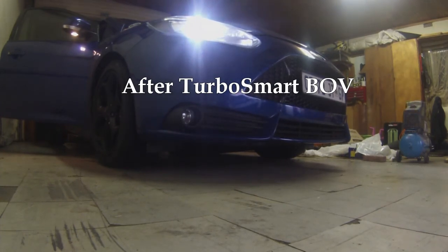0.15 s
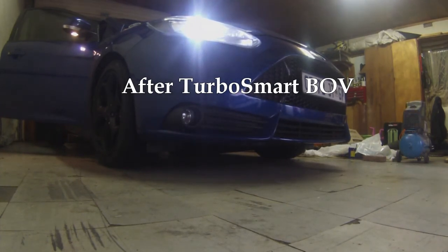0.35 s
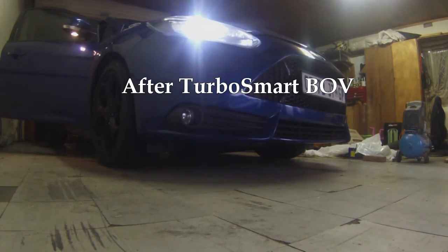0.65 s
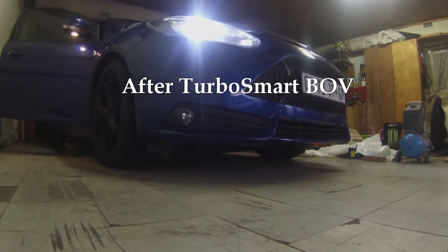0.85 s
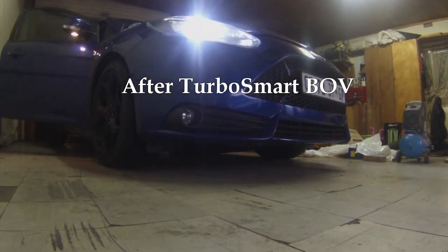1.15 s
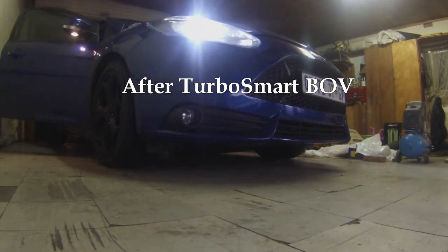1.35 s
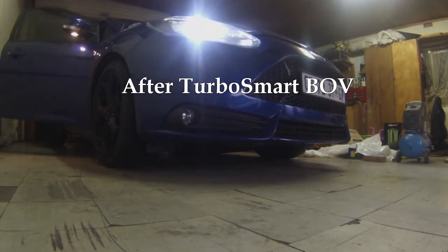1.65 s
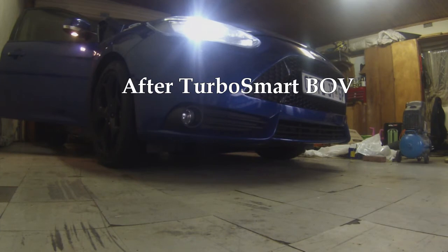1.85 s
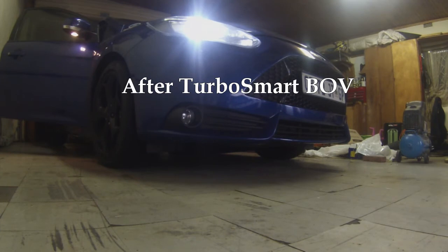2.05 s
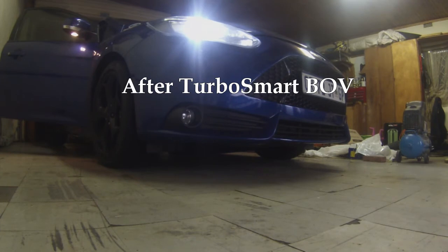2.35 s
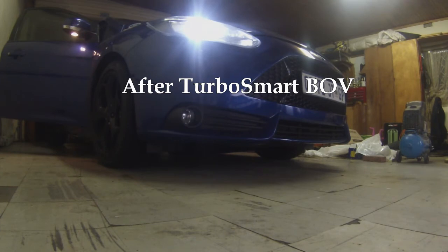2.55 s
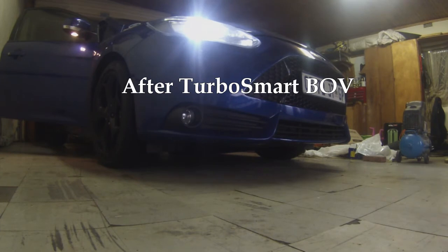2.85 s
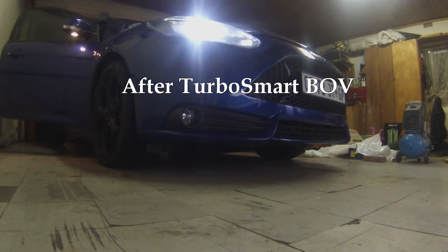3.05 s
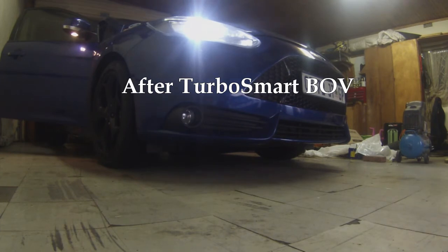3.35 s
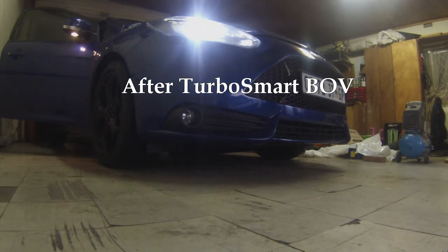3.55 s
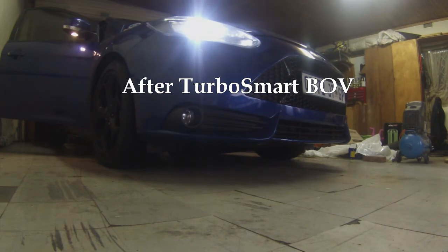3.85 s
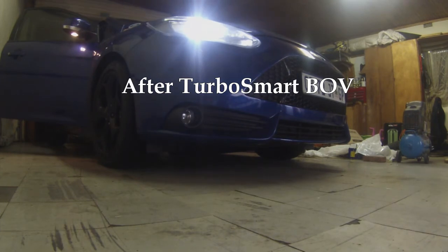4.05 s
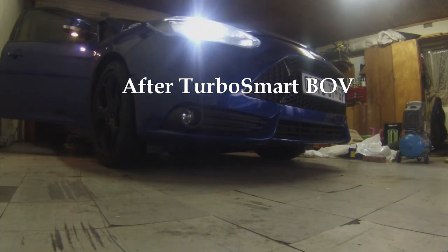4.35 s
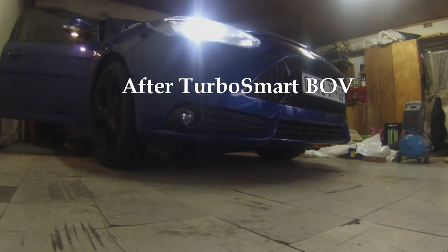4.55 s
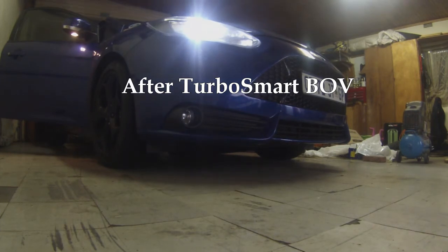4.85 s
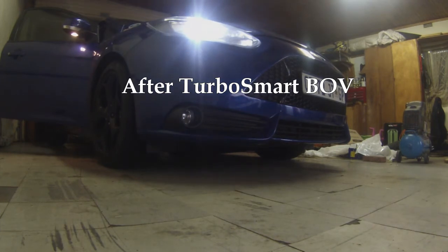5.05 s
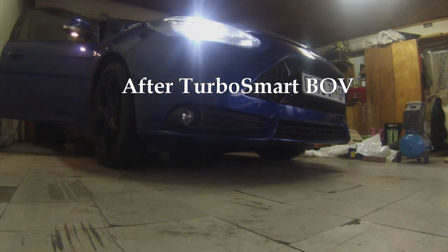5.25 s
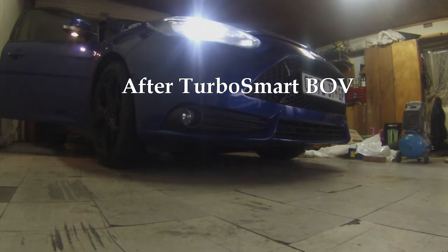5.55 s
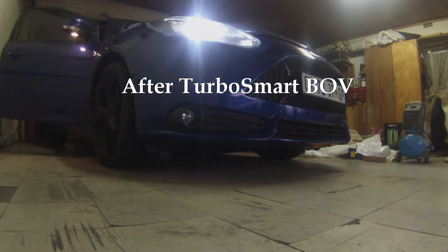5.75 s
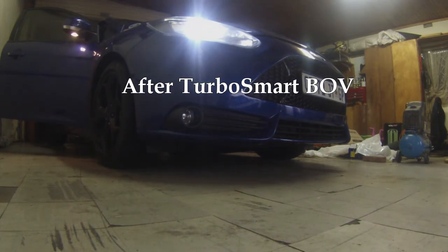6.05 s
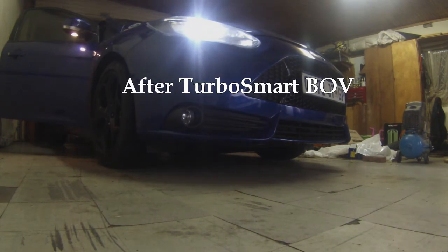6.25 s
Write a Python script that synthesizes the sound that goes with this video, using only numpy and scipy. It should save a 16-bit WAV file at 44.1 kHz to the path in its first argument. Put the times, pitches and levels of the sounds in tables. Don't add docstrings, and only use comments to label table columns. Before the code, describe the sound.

A turbo four-cylinder car engine idles in a closed garage, revs up twice, and each time a valve vents with a bright hissing whoosh.

```python
import sys
import numpy as np
from scipy import signal
from scipy.fft import rfft, irfft, next_fast_len
from scipy.io import wavfile
from scipy.ndimage import uniform_filter1d

SR = 44100
rng = np.random.default_rng(int(sys.argv[2]) if len(sys.argv) > 2 else 0)


def master(y):
    cut = np.clip(np.atleast_2d(y).T, -1, 1)
    pcm = np.round(cut * 32767)
    wavfile.write(sys.argv[1], SR, pcm.astype(np.int16))


def gain_from_db(level_db):
    decades = np.asarray(level_db, float) / 20
    return 10 ** decades


N = 282169
IDLE_PER_S = 30

# f/Hz, level/dB
LOADED = [(30, -72), (38, -55), (49, -41), (64, -47), (78, -33.5), (87.5, -47.5), (92.5, -41), (101, -75)]


def band(x, low_hz, high_hz):
    return signal.sosfilt(signal.butter(2, [low_hz, high_hz], "band", fs=SR, output="sos"), x)


def rms_one(x):
    return x / np.sqrt(np.mean(x ** 2) + 1e-20)


def at_hz(points, hz):
    table_hz, level_db = np.transpose(points)
    return np.interp(np.log(hz), np.log(table_hz), level_db)


def drift(rate_hz):
    r = np.exp(-2 * np.pi * rate_hz * 40 / SR)
    white = rng.standard_normal(N // 40 + 2002)
    slow = signal.lfilter([1], [1, -2 * r, r * r], white)[2000:]
    return np.interp(np.arange(N) / 40, np.arange(len(slow)), rms_one(slow))


def resonate(x, hz, width_hz):
    r = np.exp(-np.pi * width_hz / SR)
    poles = [1, -2 * r * np.cos(2 * np.pi * hz / SR), r * r]
    return signal.lfilter(np.array([1, 0, -1]) * (1 - r * r) / 2, poles, x)


def through(x, modes):
    return sum((-1) ** k * gain_from_db(db) * resonate(x, hz, width) for k, (hz, width, db) in enumerate(modes))


def lifted(x, peaks):
    for hz, width, db in peaks:
        x = x + (gain_from_db(db) - 1) * resonate(x, hz, width)
    return x


def air(spectrum, patchy_db, tilt_db=0):
    hz, level_db = np.transpose(spectrum)
    white, together, out = rng.standard_normal((2, N)), drift(19), 0
    edges = np.geomspace(hz[0], hz[-1] * 1.1, int(3 * np.log2(hz[-1] / hz[0])) + 2)
    for k, (low, high) in enumerate(zip(edges, edges[1:])):
        mid = np.sqrt(low * high)
        own_db = at_hz(spectrum, mid) + tilt_db * np.log2(mid / 9000)
        flutter_db = patchy_db * (together + 1.17 * drift(9))
        out = out + gain_from_db(own_db + flutter_db) * band(white[k % 2], low, high)
    return out


def tones(turns, orders):
    start = rng.random(len(orders))
    return sum(np.sqrt(2) * gain_from_db(db) * np.sin(2 * np.pi * (k * turns + p)) for (k, db), p in zip(orders, start))


def throttle():
    # pedal down t/s, pedal up t/s
    blips = [
        (1.1, 1.778),
        (4.32, 5.05),
    ]
    down_s, up_s = 0.24, 0.14
    now = np.arange(N) / SR
    return sum(np.interp(now, [down, down + down_s, up, up + up_s], [0, 1, 1, 0]) for down, up in blips)


def exhaust(turns, late_turns, firing, late_firing, opening):
    # f/Hz, level/dB
    coasting = [(32, -72), (41, -58.5), (51.5, -60), (54.5, -52), (61, -53.5), (66, -47), (74, -53),
                (92, -48.5)]
    # multiple of firing rate, level/dB
    overtones = [(2.75, -5), (3.25, -6), (4.2, 0), (5, 0), (5.8, 0), (6.25, -1), (7, 1), (7.25, 1), (8, 0),
                 (9, -4)]
    # f/Hz, width/Hz, level/dB
    pipe = [(183, 47, 3), (247, 63, 0.5), (292.4, 32, 5.5), (327, 56, -4), (463.4, 26, 1), (531, 22, -0.5),
            (613, 46, -0.5), (759, 40, -3.5), (833, 23, 1), (940, 19, 1)]
    fall_db_per_hz, fall_span_hz = 1.5, 12.6
    load_db, closed_db = -61, -22

    above_hz = np.clip(late_firing - coasting[-1][0], 0, fall_span_hz)
    coast_db = at_hz(coasting, late_firing) - fall_db_per_hz * above_hz
    note_db = opening * at_hz(LOADED, late_firing) + (1 - opening) * coast_db
    note = gain_from_db(note_db + 0.5 * drift(12)) * tones(late_turns, [(1, 0)])
    second = multiple_gain(2, firing, opening) * gain_from_db(0.5 * drift(10)) * np.sqrt(2) * np.cos(4 * np.pi * turns)
    third = multiple_gain(3, firing, opening) * gain_from_db(0.5 * drift(10)) * np.sqrt(2) * np.cos(6 * np.pi * turns)

    uneven = turns + 0.015 * drift(25)
    pulse_db = load_db + closed_db * (1 - opening) + 4.9 * np.log2(firing / 90) + 3.7 * drift(46)
    pulses = gain_from_db(pulse_db) * tones(uneven, overtones)
    return note + second + third + through(through(pulses, pipe), pipe)


def multiple_gain(k, firing, opening):
    # f/Hz, level/dB
    loaded_high = [(115, -84), (155, -66), (188, -56), (220, -69), (250, -58.5), (280, -52), (295, -71),
                   (320, -63)]
    coast_multiples = (-72.5, -82)
    idle_multiples = (-67, -69.5)
    below_first_db, idle_fade_per_s = -12, 4
    bite = 0.4

    idling = np.clip(1 - (firing - IDLE_PER_S) / idle_fade_per_s, 0, 1)
    bass = [(hz, db + below_first_db) for hz, db in LOADED]
    loaded_db = at_hz([*bass, *loaded_high], k * firing)
    rest = gain_from_db(coast_multiples[k - 2]) + idling * gain_from_db(idle_multiples[k - 2])
    return opening ** bite * gain_from_db(loaded_db) + (1 - opening) * rest


def valve():
    # f/Hz, density/dB per Hz
    jet_spectrum = [(420, -47), (650, -16), (920, -7), (1250, -6.5), (1500, -2.5), (1850, -3.5), (2400, -1),
                    (3040, 2.5), (3400, 1), (5200, -1.5), (5800, -5.5), (6520, -5), (11800, -14),
                    (15200, -19)]
    # f/Hz, width/Hz, lift/dB
    jet_peaks = [(1320, 100, -2.5), (1497, 18, 10.5), (1490, 50, -1), (1960, 31, 12), (2330, 44, 6.5),
                 (2480, 100, 8.5), (2705, 15, 10.5), (3010, 71, 7), (3166, 4.8, 14), (3430, 21, -12),
                 (3755, 120, 5.5), (4177, 81, 10.5), (4530, 29, 11), (4830, 80, 2), (5800, 420, 8),
                 (7330, 130, 5.5), (8680, 300, 6), (11660, 270, 5)]
    # f/Hz, width/Hz
    duct = (2815, 690)
    flow_db, tilt_db, duct_db = vent_flow()
    jet = air(jet_spectrum, patchy_db=0.6, tilt_db=tilt_db)
    singing = gain_from_db(duct_db) * resonate(resonate(jet, *duct), *duct)
    jet = lifted(jet + singing, jet_peaks)
    return gain_from_db(flow_db) * jet / np.std(band(jet, 6500, 12000))


def vent_flow():
    # crack t/s, swell/s, hold/s, peak level/dB, first rush re peak/dB
    vents = [
        (1.766, 0.11, 0.11, -45, -7),
        (4.974, 0.059, 0.028, -35.5, -2.5),
    ]
    shut_db, leak_s, leak_db, open_s = -95, 0.04, -20, 0.04
    fast_s, fast_db_per_s, slow_db_per_s = 0.52, 27, 20
    thin_db, thin_s, settled_db = 2.5, 0.083, -0.5
    sings_at_db, sing_db, sing_slope, sing_rest_db = -51, 2, 0.88, -7

    now, flow_db, tilt_db = np.arange(N) / SR, np.full(N, float(shut_db)), settled_db
    fast_db = -fast_db_per_s * fast_s
    for crack, swell, hold, peak_db, rush_db in vents:
        times = crack + np.cumsum([-leak_s, leak_s, open_s, swell, hold, fast_s, 10])
        levels = [shut_db - peak_db, leak_db, rush_db, 0, -1, fast_db, fast_db - 10 * slow_db_per_s]
        flow_db = np.maximum(flow_db, peak_db + np.interp(now, times, levels))
        tilt_db = tilt_db + thin_db * np.exp(-np.abs(now - crack - open_s * 1.1) / thin_s)
    duct_db = sing_db - sing_slope * np.abs(flow_db - sings_at_db)
    return flow_db, tilt_db, np.maximum(duct_db, sing_rest_db)


def intake(firing, opening):
    # f/Hz, density/dB per Hz
    roar = [(59, 14.5), (100, -2), (135, -4), (241, -7.5), (296, -5.5), (382, -10), (484, -8.5),
            (683, -11.5), (1300, -15.5), (1690, -54), (2860, -120)]
    idle_db, growth, open_db, gulp_db = -64, 0.41, 4.5, 0.8
    dump_db = -24
    gain = (firing / IDLE_PER_S) ** growth * gain_from_db(idle_db + opening * (open_db + gulp_db * drift(4.7)))
    rush = gain_from_db(vent_flow()[0] + dump_db)
    return (gain + rush) * rms_one(band(air(roar, patchy_db=0.32), 100, 6000))


def engine_bay(turns, firing, opening):
    # f/Hz, density/dB per Hz
    bay = [(410, -64), (700, -25.5), (817, 1.5), (953, -8.5), (1220, -11.5), (1790, -2), (1960, -4),
           (3040, 0), (3540, -2.5), (5560, -7.5), (6920, -15.5), (11900, -24.5), (15200, -24.5)]
    # f/Hz, width/Hz, lift/dB
    bay_peaks = [(1380, 150, -2), (1514, 236, 7.5), (1838, 16, 6), (2657, 134, 5.5), (3027, 66, 3.5),
                 (3520, 84, 3.5), (4575, 280, 6.5), (5360, 70, -7), (5566, 260, 8.5), (7200, 52, 7),
                 (9380, 220, 6.5), (11760, 370, 7.5), (13900, 490, 7), (14170, 300, -4)]
    idle_db, growth = -61, 1.63
    suction_db, lead_s = -74.5, 0.3
    hiss = lifted(air(bay, patchy_db=0.46), bay_peaks)
    suction = gain_from_db(suction_db) * np.roll(opening, -int(lead_s * SR))
    gain = (firing / IDLE_PER_S) ** growth * gain_from_db(idle_db) + suction
    return gain * gain_from_db(0.5 * np.sin(2 * np.pi * turns)) * rms_one(hiss)


def shafts(turns, firing):
    # multiple of firing rate, level/dB at 90 firings per s
    shaft_orders = [(1.5, -70), (3.25, -58), (3.75, -64), (4.15, -59), (5.25, -62), (6.1, -59), (9.9, -59)]
    # f/Hz, width/Hz, level/dB
    panels = [(142, 35, -1.5), (307.4, 15.8, -0.5), (530, 170, -8)]
    drive = (firing / 90) ** 1.42 * gain_from_db(1.4 * drift(6.7))
    return through(through(drive * tones(turns, shaft_orders), panels), panels)


def swells():
    # t/s, f/Hz, rms level/dB, half length/s
    swell_events = [(1.204, 82.5, -49, 0.053), (1.782, 78.5, -53, 0.061), (1.98, 51.5, -55.5, 0.055),
                    (2.14, 48.3, -58, .04), (3.12, 45.5, -57, 0.066), (4.404, 83.5, -52.5, 0.082),
                    (4.865, 108.5, -54, .04), (4.97, 85.5, -52, .04), (5.0, 58.5, -52, .05),
                    (5.08, 70.5, -61, .04), (5.21, 57.5, -52, .06), (5.292, 55.5, -50, .045),
                    (4.947, 264.5, -46.5, 0.076), (5.078, 262.5, -57, 0.072), (4.82, 205, -57, 0.057),
                    (4.945, 931.0, -52, 0.02), (5.13, 821.0, -55, .05), (5.172, 941.0, -50.5, .035),
                    (1.76, 781.0, -57, 0.07)]
    now, out = np.arange(N) / SR, 0
    for s, hz, db, half_s in swell_events:
        bell = np.sqrt(2) * gain_from_db(db) * np.exp(-((now - s) / half_s) ** 2)
        out = out + bell * np.sin(2 * np.pi * (hz * now + rng.random()))
    return out


def burble():
    # f/Hz, width/Hz, level/dB
    bass_modes = [(49.4, 8.3, -6), (83, 22, -14)]
    return gain_from_db(-75) * rms_one(through(through(rng.standard_normal(N), bass_modes), bass_modes))


def garage(x):
    t60_s, walls_db = 0.3, -9
    size = next_fast_len(N + SR)
    turn = 2j * np.pi * np.arange(size // 2 + 1) / size
    lags = (rng.uniform(0.006, 0.04, 10) * SR).astype(int)
    loops = [gain_from_db(-60 * lag / SR / t60_s) * np.exp(-turn * lag) for lag in lags]
    walls = sum((-1) ** k * g / (1 - g) for k, g in enumerate(loops)) / np.sqrt(len(lags))
    return irfft(rfft(x, size) * (1 + gain_from_db(walls_db) * walls), size)[:N]


def scene():
    # t/s, firing rate/Hz
    speed = [(0.0, 29.7), (1.07, 29.9), (1.2, 41.0), (1.5, 89.0), (1.61, 102.5), (1.7, 106.5),
             (1.85, 104.0), (2.19, 92.0), (2.92, 65.0), (3.19, 58.0), (3.62, 50.0), (4.1, 37.5),
             (4.32, 34.5), (4.41, 43.0), (4.78, 103.5), (4.93, 119.0), (5.3, 110.5), (6.4, 69.0)]
    flywheel_s, note_lag_s = 0.05, 0.0366
    now = np.arange(N) / SR
    firing = np.interp(now, *np.transpose(speed))
    firing = uniform_filter1d(firing, size=int(flywheel_s * SR), mode="nearest")
    late_firing, opening = np.interp(now - note_lag_s, now, firing), throttle()
    turns, late_turns = np.cumsum(firing) / SR, np.cumsum(late_firing) / SR

    engine = exhaust(turns, late_turns, firing, late_firing, opening) + shafts(turns, firing)
    noise = garage(valve() + intake(firing, opening) + engine_bay(turns, firing, opening)) * gain_from_db(0.5)
    rumble = gain_from_db(-75) * rms_one(band(rng.standard_normal(N), 10, 36))
    mono = engine + noise + swells() + burble() + rumble
    return np.array([mono, mono])


def top_cut(x):
    return signal.sosfilt(signal.butter(12, 15310, fs=SR, output="sos"), x)


def record(dry):
    heard = dry + gain_from_db(-76) * rms_one(band(rng.standard_normal(N), 5000, 14000))
    bright = band(heard[0], 90, 18000)
    bright = bright + gain_from_db(-0.5) * band(heard[0], 3100, 16000)
    mismatch = gain_from_db(-30.5 + 2.6 * drift(73)) * drift(170) * bright
    low_pass = signal.cheby2(24, 70, 15520, fs=SR, output="sos")
    return top_cut(signal.sosfilt(low_pass, heard + mismatch * np.array([[1], [-1]])))


dry = scene()
out = record(dry)
master(out)
```